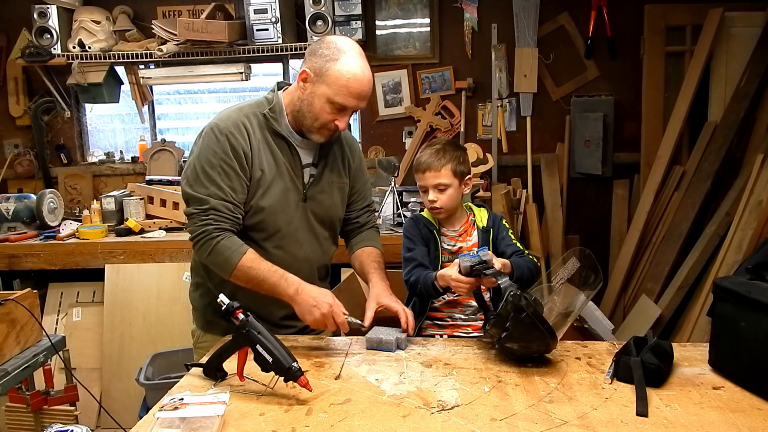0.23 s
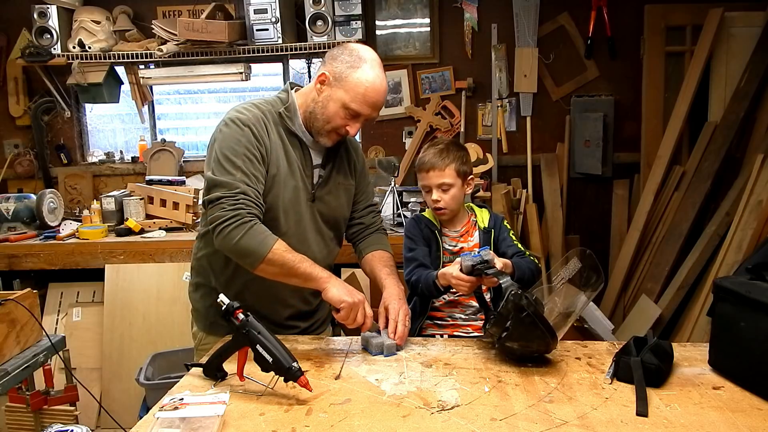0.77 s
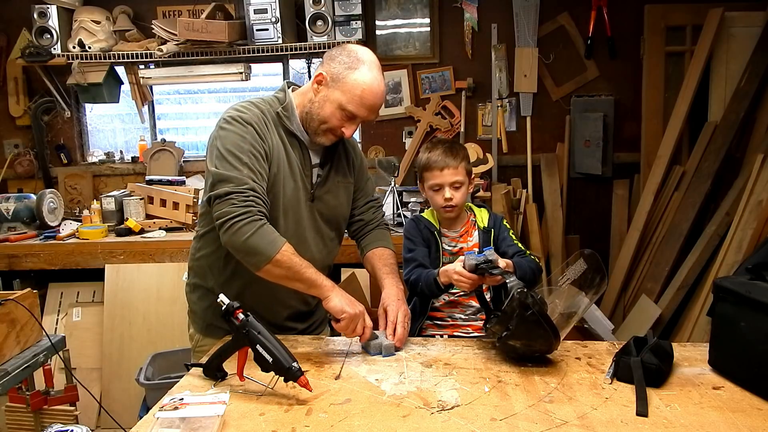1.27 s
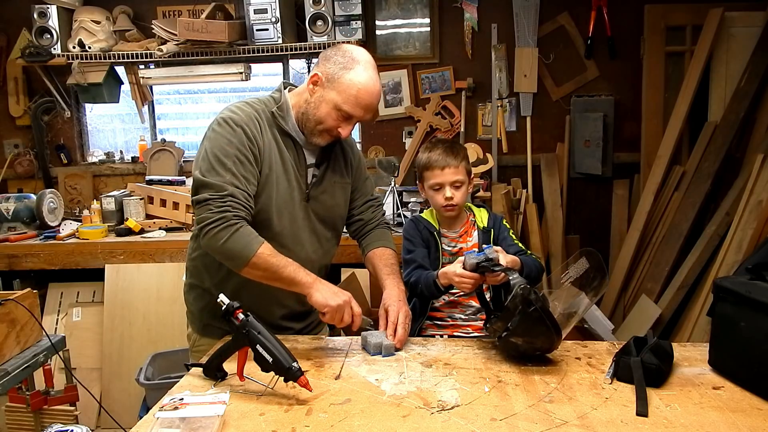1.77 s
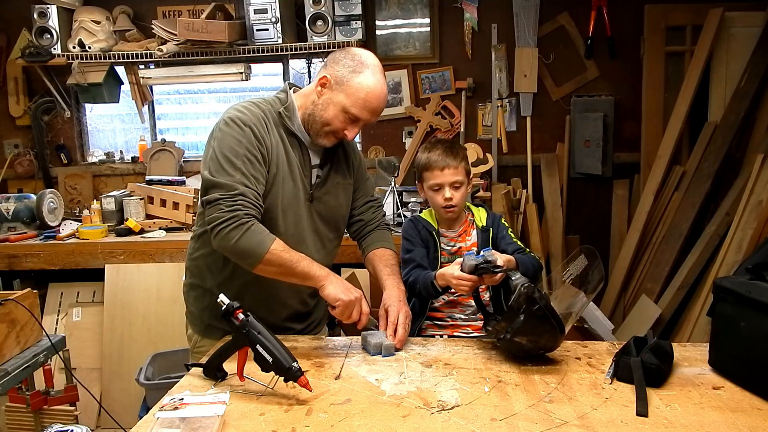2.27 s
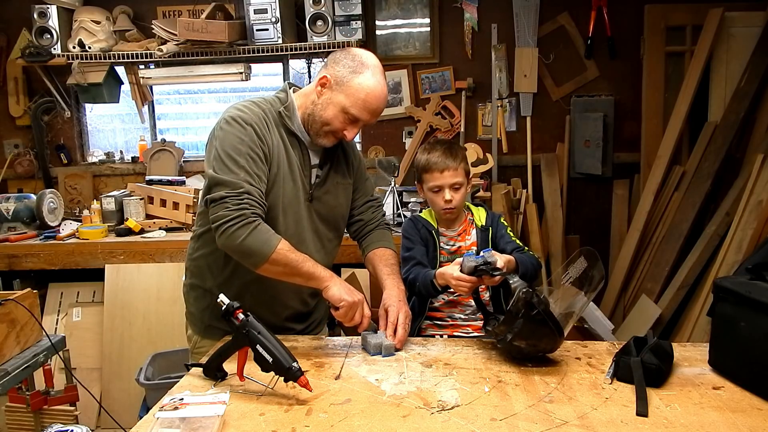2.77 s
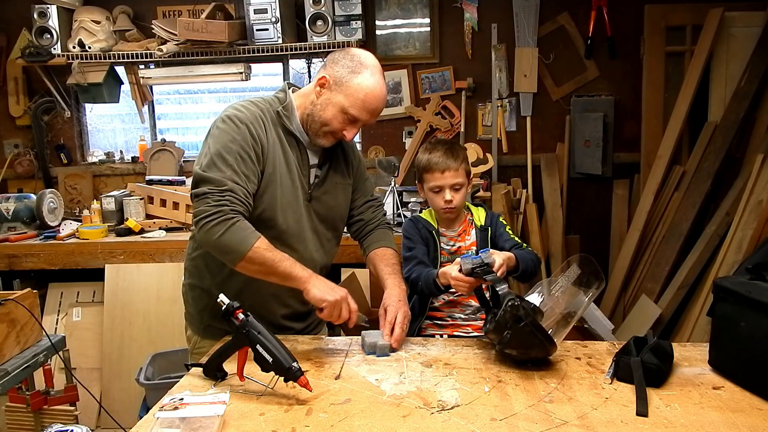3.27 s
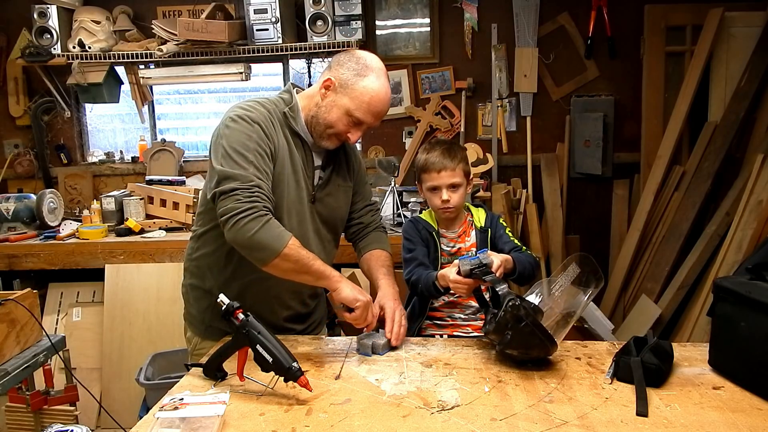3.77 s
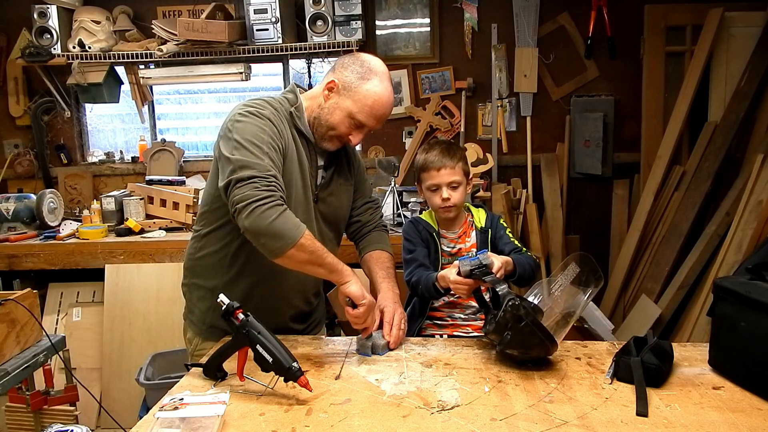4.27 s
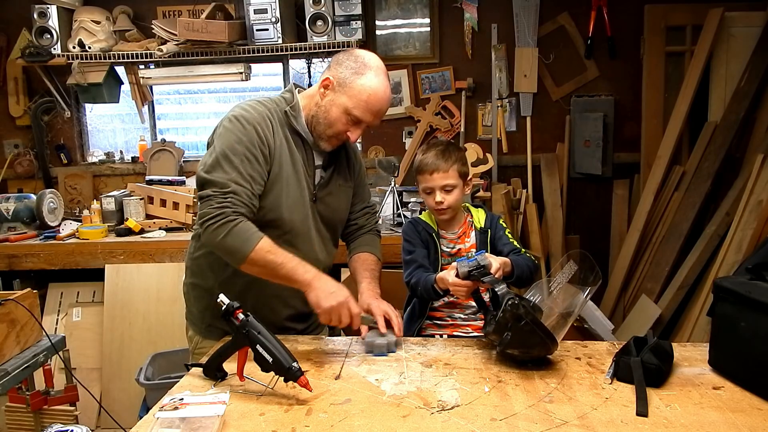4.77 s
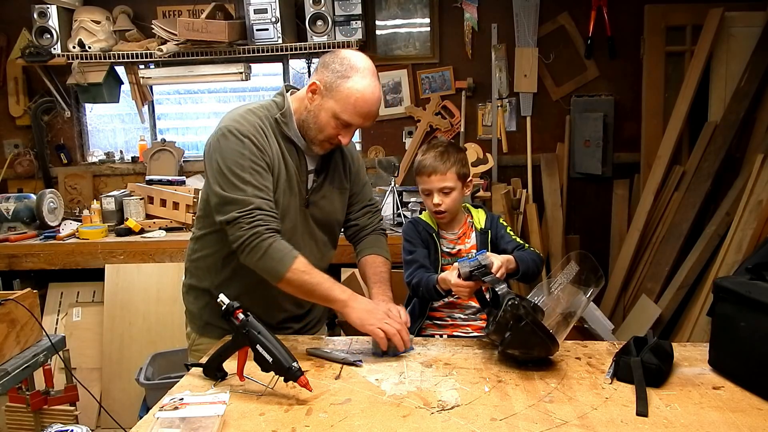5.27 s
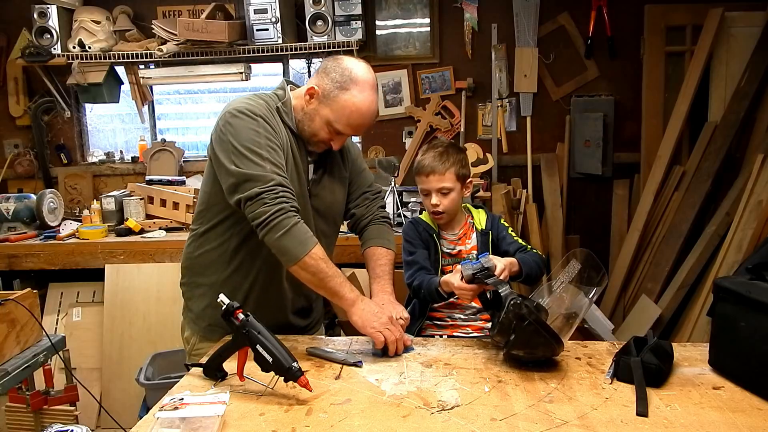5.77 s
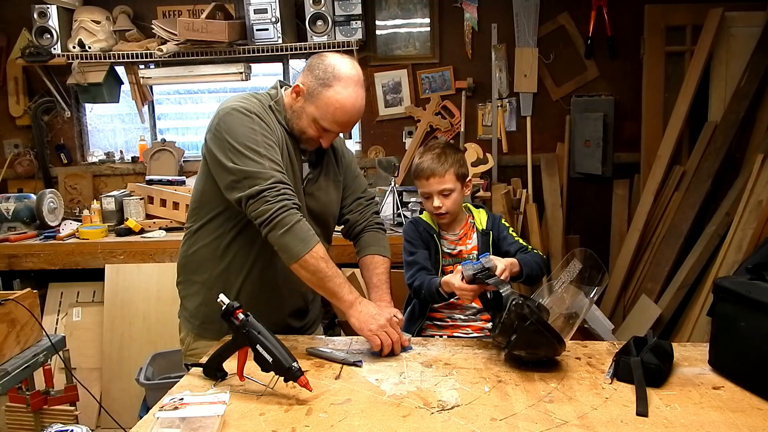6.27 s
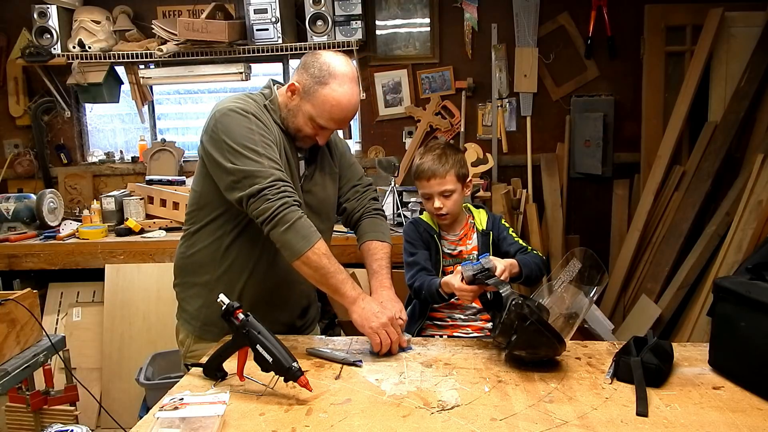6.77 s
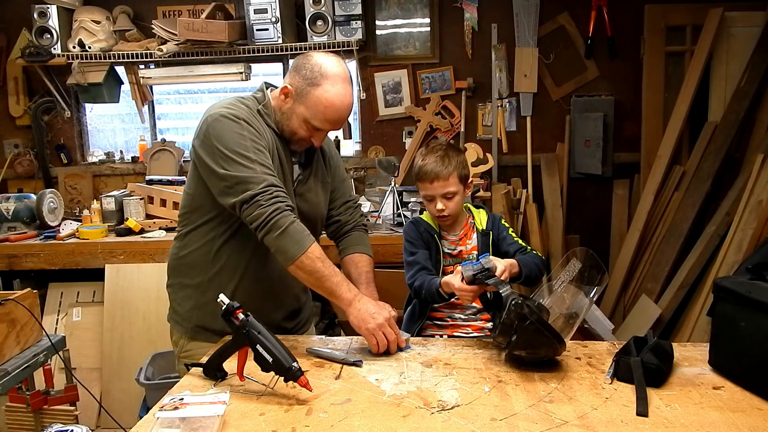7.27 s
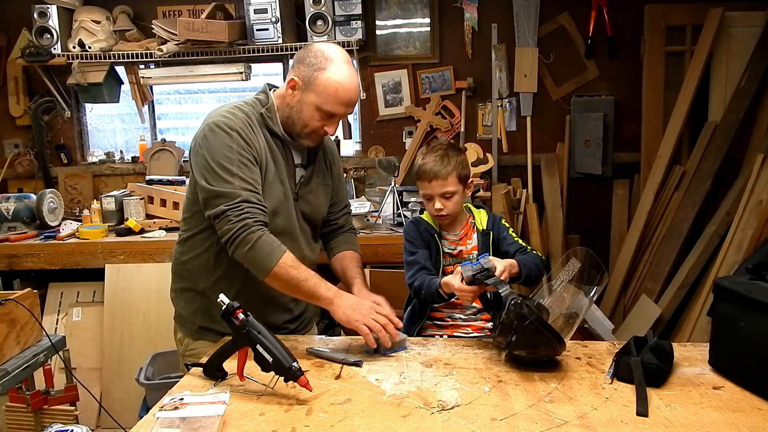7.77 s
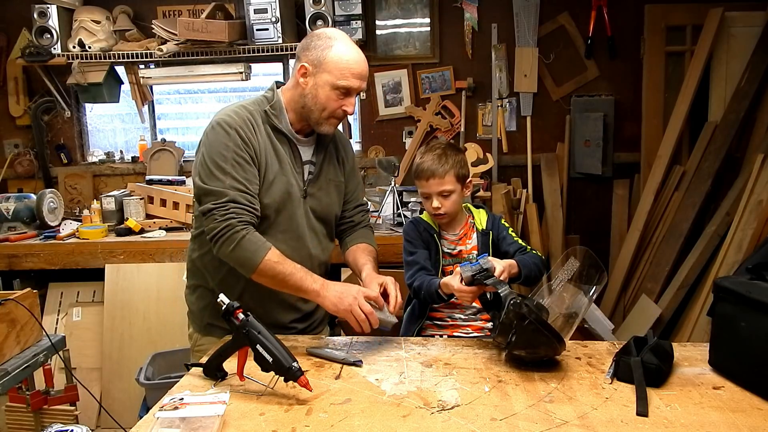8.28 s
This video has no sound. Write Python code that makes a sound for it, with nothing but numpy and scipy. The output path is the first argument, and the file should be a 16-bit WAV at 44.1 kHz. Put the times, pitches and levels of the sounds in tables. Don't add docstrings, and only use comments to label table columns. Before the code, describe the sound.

A knife saws soft packing foam in short crackling scratches, drops on a wooden bench with a hard clatter, then hands tear the foam.

```python
import sys
import numpy as np
from scipy import signal
from scipy.io import wavfile
from scipy.ndimage import uniform_filter1d

SR = 44100
rng = np.random.default_rng(int(sys.argv[2]) if len(sys.argv) > 2 else 0)


def dump_mix(stems):
    frames = np.atleast_2d(stems).T
    limited = np.clip(frames, -1, 1)
    pcm = np.round(limited * 32767).astype(np.int16)
    wavfile.write(sys.argv[1], SR, pcm)


def boost_factor(decibels):
    exponent = np.asarray(decibels, float) / 20
    return 10 ** exponent


N = 375732


def evened(x):
    return x / np.sqrt(np.mean(x ** 2) + 1e-20)


def read(points, hz):
    f, value = np.transpose(points)
    return np.interp(np.log(hz + 1), np.log(f + 1), value)


def add(mix, s, sound):
    part = mix[round(s * SR):][:len(sound)]
    part += sound[:len(part)]


def coloured(x, points):
    gain_db = read(points, abs(np.fft.fftfreq(4096, 1 / SR)))
    log_gain = np.log(boost_factor(np.maximum(gain_db, -70)))
    taps = np.fft.ifft(np.exp(np.conj(signal.hilbert(log_gain)))).real[:2048]
    return signal.oaconvolve(x, taps / np.linalg.norm(taps))[:len(x)]


def ring(x, hz, width):
    r = np.exp(-np.pi * width / SR)
    return signal.lfilter([1 - r, 0, r - 1], [1, -2 * r * np.cos(2 * np.pi * hz / SR), r * r], x)


def wander(size):
    return evened(uniform_filter1d(uniform_filter1d(rng.standard_normal(N), size), size))


def tone(table, orders, wobble_hz, wobble_db, size=4000):
    s, hz, *levels = np.transpose(table)
    t = np.arange(N) / SR
    turns = np.cumsum(np.interp(t, s, hz) + wobble_hz * wander(size)) / SR
    out = np.zeros(N)
    for order, db in zip(orders, levels):
        level = boost_factor(np.interp(t, s, db, -120, -120) + wobble_db * wander(size))
        out += np.sqrt(2) * level * np.sin(2 * np.pi * order * turns)
    return out


# (frequency [Hz], density [dB per Hz])
AIR = [(15, -24), (25, -15), (64, 1.5), (108, 2), (185, -7), (249, -5.5), (489, -13.5), (734, -11.5),
       (1020, -16), (2110, -15), (2410, -17.5), (5280, -26.5), (10400, -25), (14000, -28.5), (16000, -31)]
# (frequency [Hz], left-right likeness [0-1])
SAME = [(60, 0.98), (240, 0.72), (950, 0.4), (3770, 0.071), (15000, 0.14)]
# (time [s], level [dB])
RUMBLE = [(0.0, -45), (0.31, -56.5), (1.4, -48), (4.1, -57), (4.27, -58), (6.81, -49.5), (8.52, -54)]


def air():
    frames, hz = N // 512 + 5, np.fft.rfftfreq(2048, 1 / SR)
    a, b, c, d, patches = rng.standard_normal((frames, len(hz), 5)).T
    patches = evened(uniform_filter1d(uniform_filter1d(patches, 8, 1), 20, 0))
    s, db = np.transpose(RUMBLE)
    swell_db = np.interp(np.arange(frames) * 512 / SR, s, db - db.mean())
    low_share = 1 / (1 + (hz[:, None] / 150) ** 4)
    same, left = read(SAME, hz)[:, None], a + 1j * b
    right = same * left + np.sqrt(1 - same ** 2) * (c + 1j * d)
    z = np.array([left, right]) * boost_factor(read(AIR, hz)[:, None] + 0.84 * patches + low_share * swell_db)
    noise = evened(signal.istft(z, nperseg=2048, noverlap=1536)[1][:, :N])
    return boost_factor(-49) * boost_factor(np.array([[.4], [-.4]])) * noise


# (time [s], pitch [Hz], level [dB])
MAINS = [(0, 242.7, -69), (8.52, 237.8, -76.5)]


def lamp_hum():
    return tone(MAINS, [1], wobble_hz=0.32, wobble_db=5.0)


def crackle(per_s=12000, spread_db=2.5, clump_db=2.05):
    pops = rng.standard_normal(N) * (rng.random(N) < per_s / SR)
    size_db = spread_db * np.minimum(rng.exponential(1, N), 3)
    return evened(pops * boost_factor(size_db + clump_db * wander(size=120)))


# (frequency [Hz], density [dB per Hz])
FOAM = [(180, -20), (300, -22), (500, -16), (800, -8), (1020, -11.5), (1400, -8.5), (1550, -9.5),
        (1710, -7.5), (1940, -12), (6000, -17), (7800, -31.5), (13200, -120)]
# (frequency [Hz], density [dB per Hz])
FIZZ = [(2650, -32.5), (4500, -4.5), (7650, -2), (10800, 1), (14100, -12), (15700, -28), (16000, -88)]
# (time [s], pitch [Hz], level against the broad body [dB])
BLOCK = [(0.1, 900, 12), (.4, 2110, 7), (1.06, 1460, -14), (1.47, 2070, -11), (1.54, 1380, 4),
         (1.66, 1900, -6), (2.05, 1580, -3), (3.09, 1590, -2.5), (3.4, 1800, -12), (4.27, 1350, -0.5),
         (5.04, 1340, -14), (5.2, 700, 16.5), (5.75, 1140, 0.5), (6.3, 1430, -34), (6.85, 895, -5),
         (7.1, 1140, 5), (7.27, 2000, -8), (8.2, 1810, 2)]
# (peak time [s], body level [dB], rise [s], fall [s], fizz against body [dB])
STROKES = [(.1, -49, 0.05, 0.087, -5), (.356, -49, .035, 0.26, -2), (.494, -46.5, .055, 0.23, -7),
           (.994, -62, 0.018, .1, 0.1), (1.04, -26, 0.021, 0.17, -4), (1.078, -35, 0.012, 0.1, -19),
           (1.29, -31.5, 0.037, 0.15, -1.5), (1.346, -29.5, .008, 0.12, -6),
           (1.476, -16.5, 0.018, 0.077, -2.5), (1.607, -30.5, 0.11, 0.17, -4.5),
           (2.032, -39.5, 0.067, .01, 1), (2.04, -31.5, 0.0068, 0.15, -3), (2.262, -47.5, 0.28, 0.034, 0),
           (2.774, -58, 0.0073, 0.056, 1), (2.881, -25.5, 0.041, 0.083, -3), (3.092, -20, 0.12, 0.1, -4.5),
           (3.404, -35.5, 0.16, 0.13, -4.5), (3.828, -44, 0.0035, 0.42, -3), (3.998, -46, 0.14, 0.039, 2),
           (4.241, -10.5, 0.0033, 0.041, -5), (4.298, -33.5, 0.028, 0.17, -5),
           (4.559, -46.5, 0.17, 0.02, -2), (4.609, -49, 0.011, 0.55, -1.5), (4.915, -44.5, 0.61, .056, -4)]
PULLS = [(5.008, -22.5, 0.0051, 0.071, 1), (5.078, -31, .02, 0.13, -6.5), (5.2, -39, 0.065, 0.15, -2),
         (5.58, -52.5, 0.057, 0.7, -9), (5.73, -41.5, 0.079, 1, -19), (5.91, -41, 0.54, 0.22, -0.5),
         (6.11, -36.5, 0.011, 0.052, -2), (6.29, -38.5, 0.14, 0.094, 4.5), (6.51, -36.5, 0.065, 0.12, -3.5),
         (6.699, -40.5, 0.022, 0.22, -5), (6.84, -38.5, 0.01, 0.29, -7), (6.96, -43, .1, 0.23, -4),
         (7.068, -15.5, 0.007, .1, -4.5), (7.25, -34.5, 0.058, 0.089, -4), (7.581, -45.5, .45, 0.11, -4),
         (7.938, -51, 0.016, 0.02, 4.5), (8.06, -47, 0.014, 0.12, 2.5), (8.263, -50, 0.7, 0.083, -1.5),
         (8.499, -56.5, 0.27, 0.091, 4)]


def tears():
    swell_db = 20
    fizz_fade = 1.16
    full_db = -19.5
    block_width_hz = 1040
    t, cells = np.arange(N) / SR, crackle()
    skins = evened(cells + .45 * crackle(per_s=500, spread_db=4.0, clump_db=4.0))
    body, fizz = np.zeros(N), np.zeros(N)
    for s, db, rise, fall, fizz_db in STROKES + PULLS:
        on = slice(max(round((s - 3 * rise) * SR), 0), round((s + 3 * fall) * SR))
        early_db = swell_db * np.maximum(s - t[on], 0) / rise
        late_db = swell_db * np.maximum(t[on] - s, 0) / fall
        body_db = np.minimum(db - early_db - late_db, full_db)
        bright_db = fizz_db + np.minimum(db - early_db - fizz_fade * late_db, full_db)
        body[on] = np.hypot(body[on], boost_factor(body_db))
        fizz[on] = np.hypot(fizz[on], boost_factor(bright_db))
    bursts = body * cells
    s, hz, db = np.transpose(BLOCK)
    turn = np.exp(2j * np.pi * np.cumsum(np.interp(t, s, hz)) / SR)
    r = np.exp(-np.pi * block_width_hz / SR)
    smooth = signal.lfilter([(1 - r) ** 2], [1, -2 * r, r * r], bursts / turn)
    block = boost_factor(3.5 + np.interp(t, s, db)) * 2 * (turn * smooth).real
    return boost_factor(-4.5) * (coloured(bursts, FOAM) + block + boost_factor(0.36) * coloured(fizz * skins, FIZZ))


# (time [s], peak level [dB], body pitch [Hz], fizz against body [dB])
KNIFE_SNAPS = [(0.011, -37, 732, -13.5), (0.357, -34.5, 2450, -11), (0.364, -26, 2100, -52),
               (0.995, -28.5, 900, 2.5), (1.039, -18, 1190, -17), (1.042, -14.5, 2190, -7.5),
               (1.054, -26, 900, -6), (1.074, -17.5, 1470, -11), (1.077, -12, 1980, -14.5),
               (1.305, -26, 1700, -3), (1.348, -16.5, 1960, -10), (1.356, -21, 2080, -8),
               (1.467, -38, 2100, -11), (1.474, -25, 2200, -2), (1.593, -28, 1820, -2),
               (1.609, -27.5, 1500, -1), (1.625, -35, 2000, -8), (1.65, -37, 1900, -8),
               (1.706, -33, 711, -2.5), (1.985, -28, 3500, -27), (2.009, -48, 615, 16.5),
               (2.039, -24.5, 1670, -7), (2.041, -18, 1640, -2), (2.25, -42.5, 2200, 3),
               (2.592, -41.5, 1820, 0), (2.774, -42.5, 745, 9.5), (2.826, -37.5, 1860, 1),
               (2.846, -32, 1920, -2), (2.867, -22, 1850, 2.5), (2.87, -27, 800, -5),
               (2.881, -26, 3300, -10), (2.893, -21.5, 1460, -2), (2.98, -23.5, 1480, -7.5),
               (3.001, -23.5, 1720, -6), (3.02, -31, 1730, -6), (3.036, -20.5, 2860, -21),
               (3.057, -21.5, 1700, -12), (3.083, -22, 2750, -13), (3.093, -12.5, 1470, -16),
               (3.546, -37.5, 2740, -7.5), (3.83, -27.5, 1480, 0), (3.918, -44, 653, 6.5),
               (3.978, -23.5, 3650, -39), (4.003, -42, 2670, 14.5), (4.242, -14, 1580, -5.5),
               (4.256, -19.5, 1500, 0), (4.266, -19.5, 1500, 0.5), (4.305, -28, 1420, -8)]
HAND_SNAPS = [(4.608, -30, 2520, -11), (4.616, -35, 3000, -11), (5.004, -9, 1980, -15),
              (5.024, -9.5, 3480, -17), (5.03, -21, 3670, -18), (5.41, -44, 1350, -10),
              (5.543, -36, 811, -5), (5.62, -39.5, 790, -3), (5.735, -23.5, 1700, -10),
              (5.806, -27, 2780, -23), (5.82, -28, 2980, -17), (5.85, -31, 810, -2),
              (5.89, -24.5, 2940, -12), (5.927, -29, 1300, -14), (5.948, -27.5, 2010, -18),
              (6.106, -23.5, 1900, -15), (6.212, -24.5, 740, -44), (6.225, -31.5, 1450, -2),
              (6.259, -27, 2230, -5), (6.284, -23, 1510, -6), (6.287, -22, 3520, -22),
              (6.48, -41, 846, -15), (6.5, -40, 700, -10), (6.684, -40, 1520, -4.5),
              (6.695, -34, 1360, -25), (6.758, -23, 1590, -38), (6.837, -23.5, 750, -34),
              (6.848, -24.5, 802, -16.5), (6.954, -33, 795, -13), (6.985, -33.5, 1040, -11),
              (7.02, -48.5, 1430, 4), (7.047, -27.5, 1143, -29), (7.066, -10, 1660, -30),
              (7.083, -12, 1100, -22), (7.246, -25.5, 1890, -26), (7.446, -49, 2166, 11),
              (7.461, -51, 2000, 9)]


def snaps(width=2000, fizz_lift_db=12, ring_db=8, burst_s=0.0026, crack_db=8, crack_per_fizz=0.37):
    t, body, fizz, tuned = np.arange(2000) / SR, np.zeros(N), np.zeros(N), np.zeros(N)
    rows = KNIFE_SNAPS + HAND_SNAPS
    chance = rng.standard_normal((len(rows), 2, len(t)))
    for (s, db, hz, fizz_db), (sign, gate) in zip(rows, chance):
        spray = sign * (gate > .6) * np.minimum(t / 0.00025, 1) * np.exp(-t / burst_s)
        spray = spray / np.linalg.norm(spray)
        spray[4] -= .75
        add(body, s, boost_factor(db + crack_db + crack_per_fizz * fizz_db) * spray)
        add(tuned, s, boost_factor(db + ring_db) * ring(ring(spray, hz, width), hz, width))
        add(fizz, s, boost_factor(db + fizz_db + fizz_lift_db) * spray)
    return 2.16 * coloured(body, FOAM) + 3.77 * tuned + 1.84 * coloured(fizz, FIZZ)


# (frequency [Hz], width [Hz], level [dB])
BENCH = [(167.6, 15.5, -2), (207, 5.9, 1.5), (282, 34, 1), (409, 18, 2), (620, 150, -3.5), (796, 122, 6.5),
         (1220, 270, -10), (1446, 59, 6), (1900, 160, -4)]


def blows(table, plank_share, turns):
    t, out = np.arange(9000) / SR, np.zeros(N)
    for s, db, hz, t60 in table:
        u = t * hz / turns
        blow = u ** 2 * np.exp(-4.0 * u)
        planks = sum((-1) ** k * boost_factor(d) * ring(blow, f, w) for k, (f, w, d) in enumerate(BENCH))
        spot = ring(blow, hz, 2.6 / np.clip(t60, .002, .3))
        add(out, s, boost_factor(db) * (spot / abs(spot).max() + plank_share * planks / abs(planks).max()))
    return out


# (time [s], peak level [dB], pitch [Hz], t60 [s])
KNOCKS = [(0.063, -19.5, 820, 0.019), (.072, -35, 1100, 0.008), (0.081, -24, 1140, 0.017),
          (.087, -29.5, 1740, 0.0088), (0.129, -36, 298, 0.0087), (0.179, -33, 830, 0.0065),
          (2.038, -12.5, 1900, 0.011), (4.243, -26, 1497, 0.16), (5.0038, 1, 2020, 0.0093),
          (5.008, -18, 694, 0.0091), (5.018, -12, 1300, 0.011), (5.025, -10.5, 604, 0.0059),
          (5.029, -9, 800, 0.013), (5.045, -22, 1500, .03), (5.077, -9, 900, 0.005),
          (5.081, -16, 1700, 0.013), (5.102, -14.5, 880, 0.0065), (5.167, -11.5, 744, 0.021),
          (5.19, -17, 660, 0.011), (5.23, -20, 850, 0.0018), (5.262, -21.5, 715, 0.0037),
          (5.573, -30.5, 1430, 0.024), (7.262, -35, 2080, .05), (8.055, -46, 1770, 0.082),
          (8.247, -48, 1717, .03)]
THUDS = [(0.089, -35, 570, 0.018), (.1, -35, 380, .04), (.165, -42, 220, 0.039), (.184, -45, 330, .04),
         (1.05, -28.5, 310, 0.038), (1.492, -15, 275, 0.022), (1.52, -26.5, 240, 0.047),
         (1.545, -26.5, 198, 0.067), (2.874, -24.5, 530, 0.016), (3.132, -19.5, 238, 0.02),
         (3.15, -28, 606, 0.028), (3.165, -28, 460, 0.034), (3.18, -32, 326, 0.035),
         (3.198, -35, 302, 0.032), (3.22, -49, 250, 0.036), (4.243, -20, 614, 0.1), (5.003, -17, 304, 0.14),
         (5.024, -28, 316, .08), (5.076, -18, 302, 0.048), (5.167, -19, 340, 0.03),
         (5.189, -21, 300, 0.071), (5.23, -20.5, 328, 0.015), (5.263, -35, 281, 0.05),
         (5.484, -45, 289, 0.26), (5.705, -36, 604, 0.024), (6.691, -37.5, 406, 0.058),
         (7.09, -24, 284, 0.17), (7.294, -39, 264, 0.054), (7.326, -33, 264, 0.13),
         (7.496, -43.5, 279.4, 0.14), (7.755, -43, 328, .06), (7.77, -45, 200, .06), (8.122, -40, 423, .05),
         (8.14, -44, 560, .05)]


def bench():
    knocks = blows(KNOCKS, plank_share=0.41, turns=0.33)
    return knocks + boost_factor(-3.5) * blows(THUDS, plank_share=0.94, turns=0.24)


# (time [s], pitch [Hz], level [dB])
SQUEAK = [(0.26, 9000, -73), (0.31, 10440, -56), (0.41, 11200, -58), (0.504, 12600, -68),
          (0.588, 11399, -58), (0.628, 11287, -57), (0.708, 9900, -58), (0.77, 9666, -64),
          (0.86, 8800, -78)]


def squeak():
    return boost_factor(-4.5) * tone(SQUEAK, [1], wobble_hz=10, wobble_db=1.5, size=400)


# (time [s], turn rate [Hz], level [dB])
ENGINE = [(.3, 17.5, -63), (.9, 18.6, -56), (1.5, 19.5, -55), (2.2, 19.4, -55), (2.6, 18.7, -57),
          (3, 17.9, -54), (3.6, 17.7, -55), (4.1, 16.6, -60), (5, 16.3, -60)]
# (frequency [Hz], gain [dB])
PIPE = [(58, 0), (66, -11), (72, -7), (76.5, 2), (83, -3), (89, -8), (99, -10), (107, 1)]


def far_engine():
    orders = np.arange(3, 7)
    rows = [(s, hz, *(db + read(PIPE, orders * hz))) for s, hz, db in ENGINE]
    return tone(rows, orders, wobble_hz=0.13, wobble_db=-2.0)


# (time [s], firing rate [Hz], order 2 level [dB], order 3 level [dB])
TRUCK = [(5.6, 42.7, -78, -59), (6.05, 43.74, -53.5, -58), (6.44, 47.6, -77, -68), (6.58, 49.37, -65, -71),
         (7.2, 50.15, -52, -55.5), (7.56, 48.7, -86.5, -60.5), (7.83, 52.6, -60, -60.5),
         (8.52, 49.7, -59.5, -63.5)]
# (time [s], pitch [Hz], level [dB])
GROAN = [(5.6, 47.8, -68), (5.92, 50.6, -59), (6.98, 54.6, -56), (7.36, 59.1, -56), (7.58, 57.1, -62),
         (7.77, 58.8, -51), (7.94, 58.7, -58), (8.52, 55.3, -57)]


def far_truck():
    firing = tone(TRUCK, [2, 3], wobble_hz=0.408, wobble_db=4.5)
    return firing + tone(GROAN, [1], wobble_hz=0.65, wobble_db=4.0)


# (frequency [Hz], t60 [s])
ROOM = [(200, 0.5), (700, 0.37), (1600, 0.39), (4000, 0.26), (10000, 0.25)]
# (delay [s], level [dB])
ECHOES = [(.0022, -7), (.0041, -9), (.0075, -11), (.012, -13), (.021, -13)]


def tail(echo_db=-3, tail_db=-3):
    taps = np.zeros((2, SR // 2))
    at = np.arange(200, SR // 2 - 20, 10) + rng.integers(0, 10, (2, (SR // 2 - 211) // 10))
    np.put_along_axis(taps, at, rng.choice([-1., 1.], at.shape), 1)
    hz, t, z = signal.stft(taps, SR, nperseg=256)
    z = z * boost_factor(-60 * t / read(ROOM, hz)[:, None])
    out = signal.istft(z, SR, nperseg=256)[1][:, :SR // 2]
    out = boost_factor(tail_db) * out / np.linalg.norm(out[0])
    for s, db in ECHOES:
        at = round(s * SR * rng.uniform(.9, 1.1)) + rng.integers(0, 12, 2)
        out[[0, 1], at] += boost_factor(db + echo_db) * rng.choice([-1, 1])
    return out


def room(x, turns_per_s=1.7):
    turn = np.pi * turns_per_s * np.arange(N) / SR
    wet = np.zeros((2, N))
    for k in range(3):
        feed = np.sqrt(2 / 3) * np.cos(turn + k * np.pi / 3) * x
        wet += signal.fftconvolve(feed[None], tail(), axes=1)[:, :N]
    side = wet[0] - wet[1]
    apart = 0.58 * signal.lfilter(*signal.butter(1, 2600, "high", fs=SR), side) + 0.1 * side
    return wet.mean(0) + np.array([apart, -apart])


def scene():
    work = tears() + snaps() + bench()
    heard = work + room(work) + squeak() + lamp_hum() + far_engine() + far_truck()
    middle = heard.mean(0)
    lean = 0.16 * signal.lfilter(*signal.butter(1, 2500, fs=SR), middle) - .02 * middle
    return heard + np.array([lean, -lean]) + air()


def band_limit(x):
    return signal.sosfilt(signal.butter(12, 16640, fs=SR, output="sos"), x)


def record(dry):
    power_db = 10 * np.log10(abs(uniform_filter1d((dry ** 2).mean(0), 300)) + 1e-12)
    fall = np.arange(N) * 8.8 / SR
    over_db = np.maximum(np.maximum.accumulate(power_db + fall) - fall + 25.5, 0)
    late_db = signal.lfilter([.003], [1, -.997], over_db)
    held = .95 * np.tanh(dry / boost_factor(.35 * late_db) / .95)
    edge = signal.firwin(101, 15500, window=("kaiser", 8), fs=SR)
    return band_limit(signal.oaconvolve(held, edge[None], "same"))


dry = scene()
out = record(dry)
dump_mix(out)
```